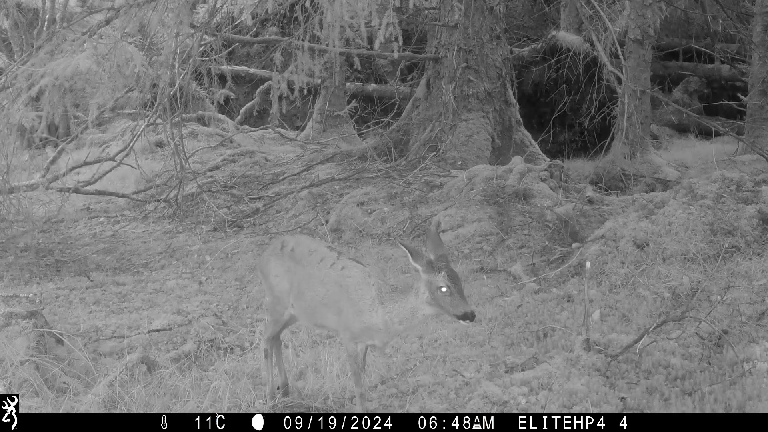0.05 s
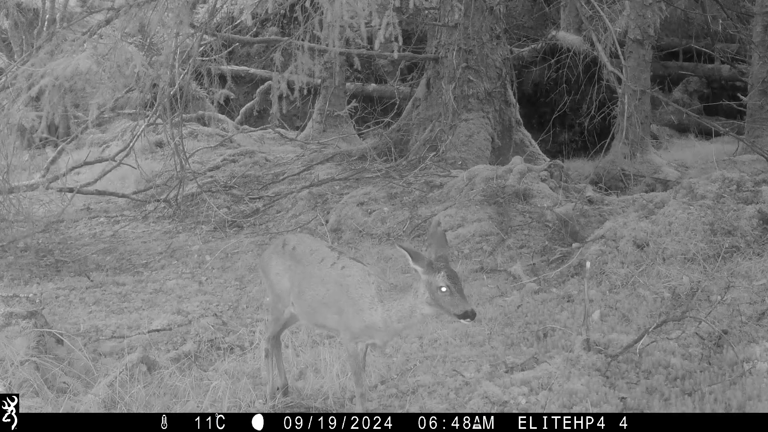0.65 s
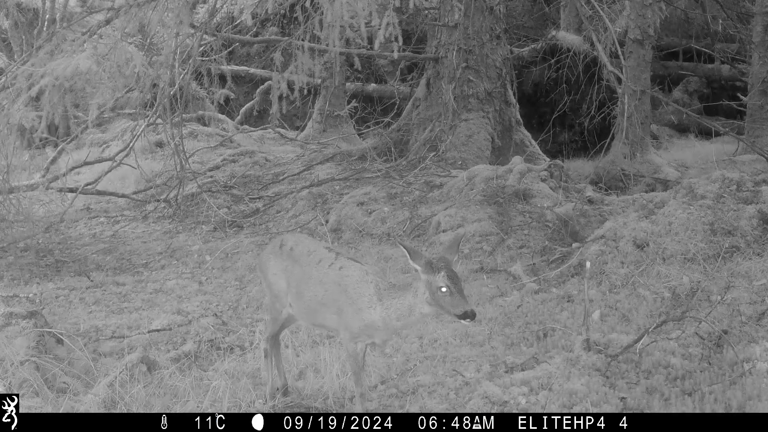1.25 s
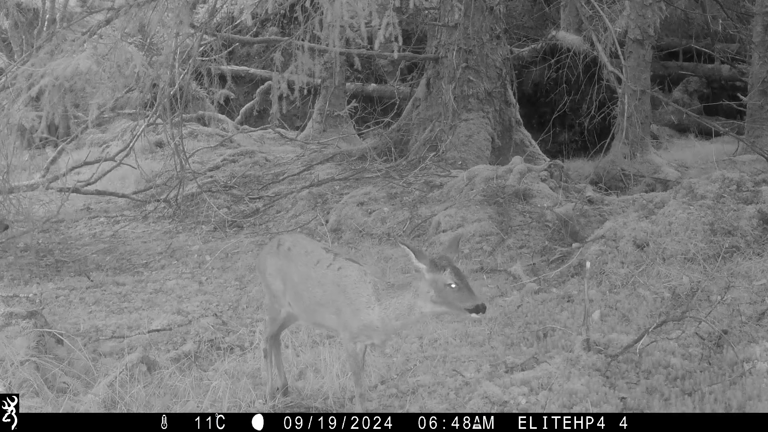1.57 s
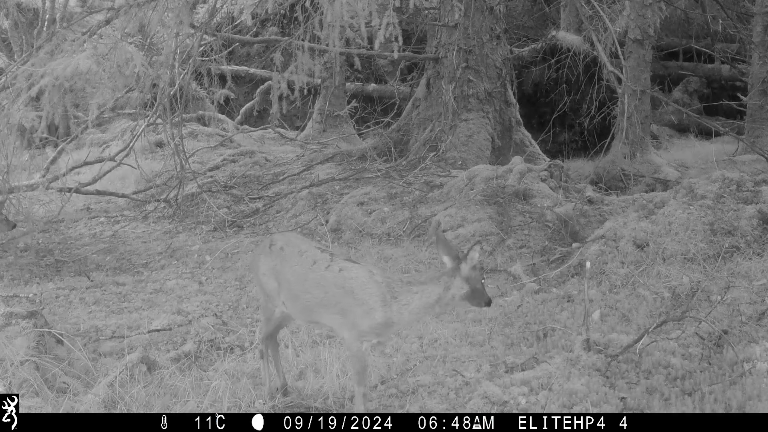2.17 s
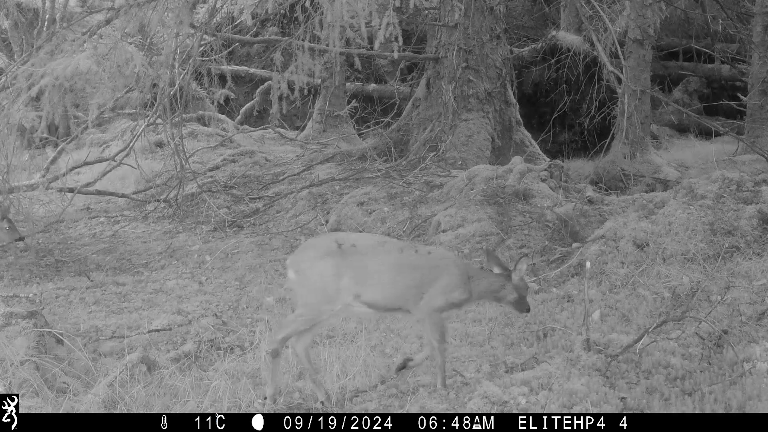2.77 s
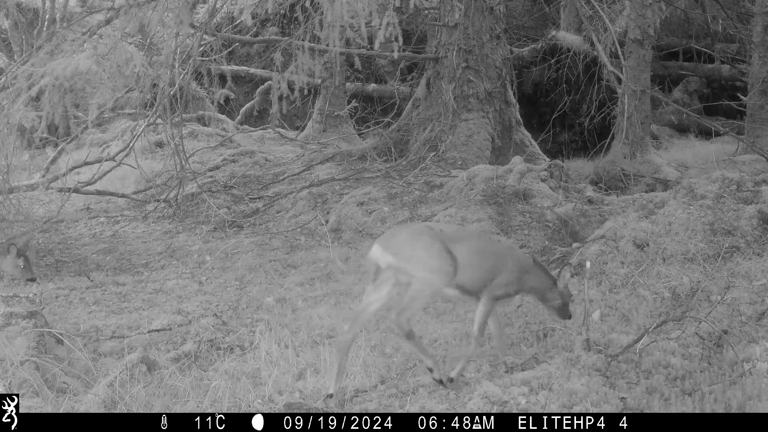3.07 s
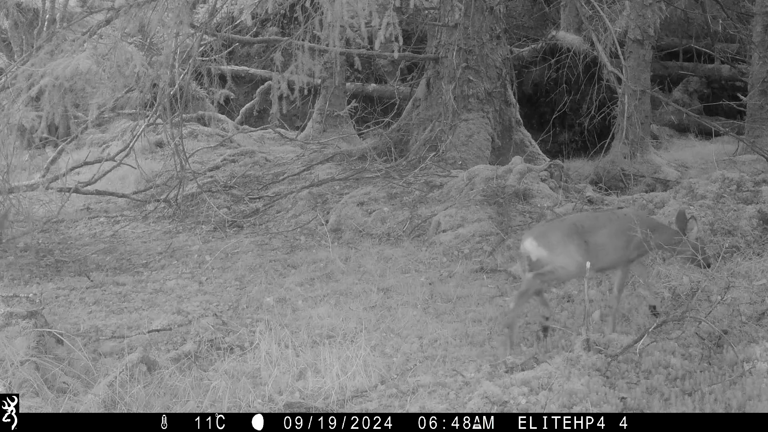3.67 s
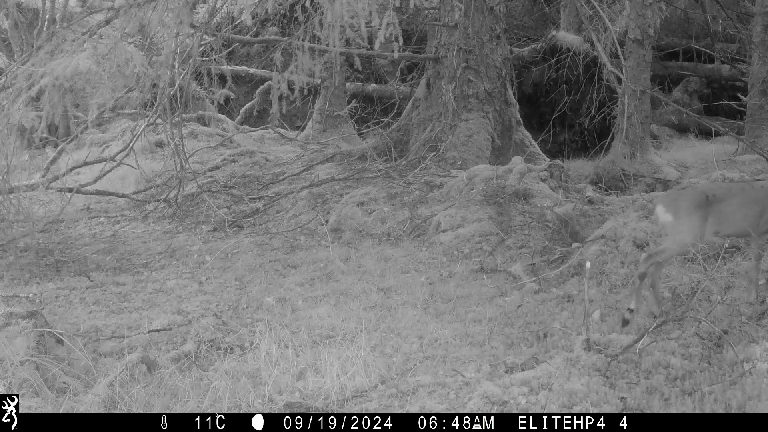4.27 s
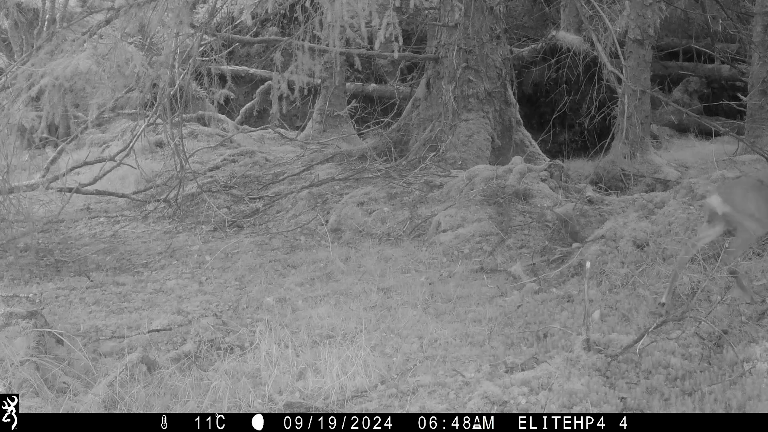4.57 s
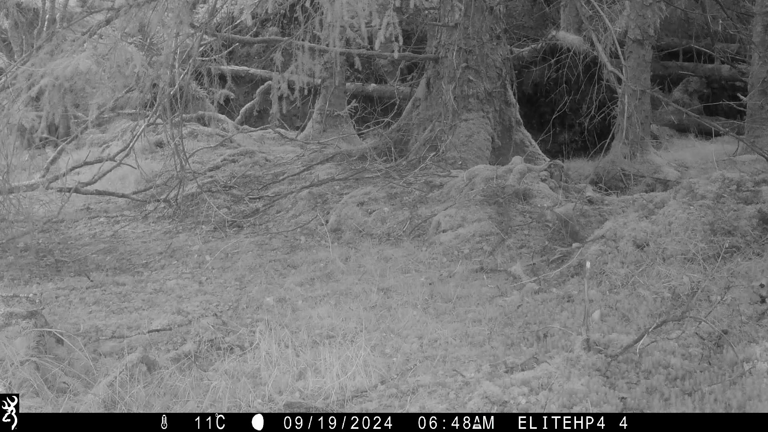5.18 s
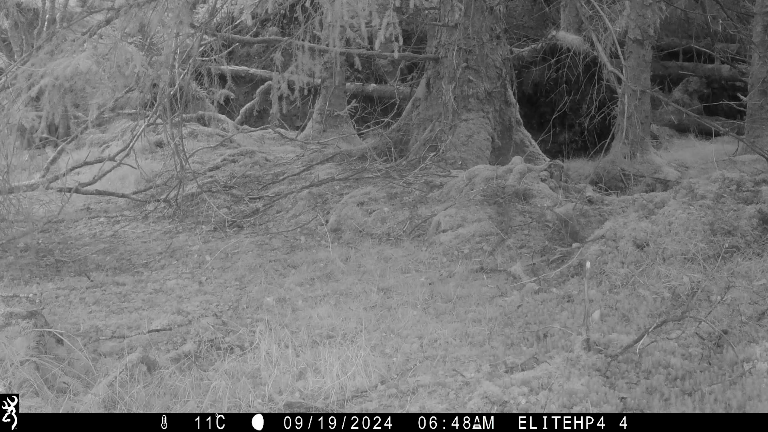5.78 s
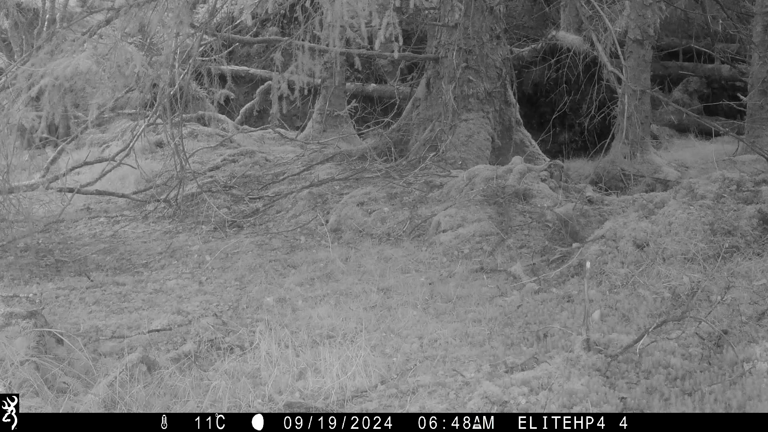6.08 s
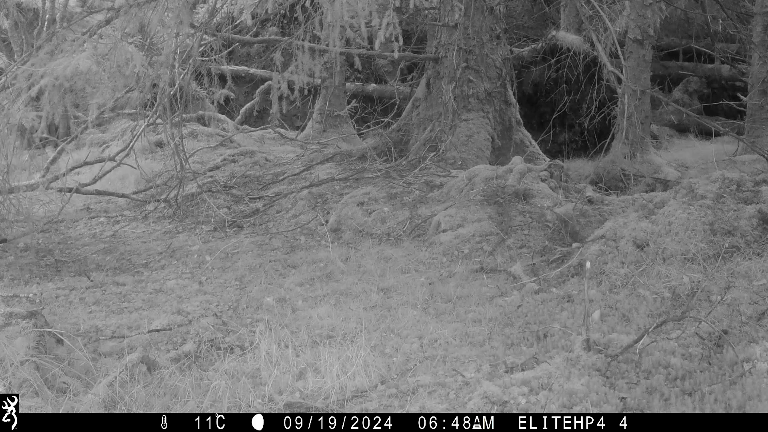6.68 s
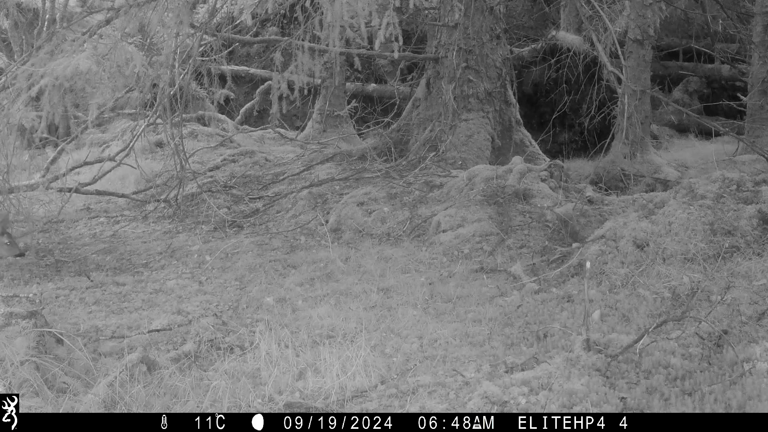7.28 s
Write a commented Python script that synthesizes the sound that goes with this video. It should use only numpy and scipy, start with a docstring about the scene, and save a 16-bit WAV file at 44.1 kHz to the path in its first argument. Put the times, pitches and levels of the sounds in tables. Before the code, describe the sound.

A steady, soft hiss from a small outdoor microphone fills all seven seconds or so, with a very faint, high, buzzing electronic whine above it. At about 1.6 seconds a young deer bleats: a thin, high, nasal squeal about a quarter of a second long that swells, falls in pitch and breaks into a rasp. A brief, low, fluttering throat growl sits underneath. This is the loudest sound. From about 2.7 to 4.2 seconds the deer walks through grass, making a handful of very short, faint swishes with tiny crackles of dry stems, barely above the hiss. At about 4.5 seconds comes a second bleat, just as short but quieter, falling only slightly and fading to a raspy end. The tree trunks around the clearing give the calls a faint, short echo. From about 5 seconds to the end, only the hiss and whine remain.

```python
"""A forest clearing, near a trail camera: a young deer bleats twice and walks off through the grass.
Each bleat is a thin falling squeal that ends in a rasp as the vocal folds slacken; under the first,
the throat flaps in a low growl. Hooves swish and crackle, and the trunks return a faint echo.
The camera's small microphone lays down a steady hiss and its electronics add a faint high whine."""
import sys
import numpy as np
from scipy import signal
from scipy.fft import rfft, irfft
from scipy.io import wavfile

SR = 44100
rng = np.random.default_rng(int(sys.argv[2]) if len(sys.argv) > 2 else 0)


def master(y):
    """Save y as 16-bit WAV."""
    cut = np.clip(np.atleast_2d(y).T, -1, 1)
    pcm = np.round(cut * 32767)  # scale
    wavfile.write(sys.argv[1], SR, pcm.astype(np.int16))


N = 323694

# colour of the microphone hiss: f/Hz, level/dB
HISS_COLOUR = [(25, -31), (100, -16.5), (300, -7), (620, -0.5), (900, -1.5), (1600, -4), (1950, -6.5),
               (2850, -10), (3350, -14.5), (4350, -14), (4850, -26), (6100, -39.5), (7000, -44.5),
               (15500, -48.5)]
# resonances of the microphone port: f/Hz, width/Hz, lift/dB
PORT_PEAKS = [(1287, 190, 5.1), (1690, 83, 1.3), (3945, 220, 3.7)]
# moments when the whine stumbles: t/s
WHINE_STUMBLES = [1.252, 1.963, 2.149, 3.375]
# hooves in grass and twigs: t/s, length/s, swish level/dB, crackle level/dB
HOOF_STEPS = [(.335, .03, -74, -88), (2.712, .025, -66, -86), (2.743, 0.026, -58, -90),
              (3.052, .04, -60, -89), (3.19, .03, -68, -88), (3.535, .04, -60, -90), (3.81, .05, -65, -88),
              (4.072, 0.009, -55, -77), (4.128, .02, -61, -89)]
# colour of brushed grass: f/Hz, level/dB
SWISH_COLOUR = [(800, -24), (2500, -1), (4200, 7), (5000, -10), (6500, -39)]
# colour of snapping stems: f/Hz, level/dB
CRACKLE_COLOUR = [(5000, -18), (8000, -4), (9500, 0), (11000, -3), (14000, -14)]
# low throat resonances that the growl rings: f/Hz, width/Hz, level/dB
GROWL_RESONANCES = [(490, 58, -7), (655, 130, 14), (830, 72, -9)]
# mouth resonances that turbulent air rings: f/Hz, width/Hz, level/dB, share of mouth movement followed
RASP_BANDS = [(2620, 410, -3, .3), (4280, 580, 0.5, 1), (5230, 640, -14, 0.041)]
# throat EQ as heard through the microphone, at a mouth opening of 1: f/Hz, level/dB
THROAT_EQ = [(650, 9.5), (1000, -24), (1500, -0.5), (2060, 10.5), (2400, 11), (3050, 7.5), (3800, -4.5),
             (4120, 9), (4550, 8), (4820, 2.5), (5250, -10.5), (6500, -28), (10400, -18)]
# bleats: t/s, hold/s, sag/s, tail/s, top pitch/Hz, pitch break/Hz, effort/dB, tail fade/dB,
# nasal lift/dB, top brightness/dB, slack brightness/dB, mouth opening/factor, closing in the tail/share
BLEAT_CUES = [(1.597, .053, .15, .068, 1040, 250, -39.5, -2.5, 9.5, -0.5, -1.5, .99, 0.009),
              (4.52, .064, .084, 0.095, 1004, 8, -46, -17, 16, -5, 9, .92, .08)]


def amp(db):
    """Decibels to gain."""
    return 10 ** (np.asarray(db) / 20)


def unit(x):
    """Scales to rms 1."""
    return x / np.sqrt(np.mean(x ** 2) + 1e-20)


def ramp(t, start, length):
    """Climbs from 0 at start to 1 after length, and stays there."""
    return np.clip((t - start) / length, 0, 1)


def eq_db(points, hz):
    """Reads an EQ curve on a log-frequency axis."""
    f, db = np.transpose(points)
    return np.interp(np.log(hz + 1), np.log(f), db)


def add(mix, start_s, sound):
    """Mixes a sound in at its cue."""
    part = mix[round(start_s * SR):][:len(sound)]
    part += sound[:len(part)]


def noise(colour, peaks=()):
    """Noise of rms 1, shaped by an EQ curve and bell boosts."""
    hz = np.fft.rfftfreq(N, 1 / SR)
    db = eq_db(colour, hz) + sum(lift / (1 + (2 * (hz - f) / width) ** 2) for f, width, lift in peaks)
    return unit(irfft(rfft(rng.standard_normal(N)) * amp(db), N))


def wobble(hz):
    """Random modulation of rms 1, rolling off above hz."""
    f = np.fft.rfftfreq(N, 1 / SR)
    return unit(irfft(rfft(rng.standard_normal(N)) / (1 + (f / hz) ** 2), N))


def microphone_hiss(level_db=-50):
    """The bed: steady hiss, coloured by the resonances of the microphone port."""
    return amp(level_db) * noise(HISS_COLOUR, PORT_PEAKS)


def electronics_whine(hz=7796.3, flips_per_s=59.5, level_db=-79, overtone_db=-102):
    """A high tone buzzes as it flips its sign; at each brief stumble it jumps in pitch and ducks."""
    t = np.arange(N) / SR
    stumble_s, mean_jump_hz, duck_db = .027, 175, -4
    stumbling = sum((t > start) & (t < start + stumble_s) for start in WHINE_STUMBLES)
    phase = 2 * np.pi * np.cumsum(hz + mean_jump_hz * stumbling * (1 + wobble(300))) / SR
    flips = np.sign(np.sin(np.pi * flips_per_s * t))
    buzz = amp(level_db + duck_db * stumbling) * flips * np.sin(phase)
    return np.sqrt(2) * (buzz + amp(overtone_db) * np.sin(2 * phase))


def trunk_echo(sound, decay_s=.35, wet_db=-22, predelay_s=.015, echoes_per_s=2000):
    """Trunks scatter a faint, short reverb behind the direct sound."""
    t = np.arange(SR // 2) / SR
    taps = rng.standard_normal(len(t)) * (rng.random(len(t)) < echoes_per_s / SR) * (t > predelay_s)
    tail = taps * np.exp(-np.log(1000) * t / decay_s)
    return sound + amp(wet_db) * signal.fftconvolve(sound, tail / np.linalg.norm(tail))[:N]


def hooves(grain_db=3):
    """Each hoof brushes the grass and cracks a few dry stems."""
    track, t = np.zeros(N), np.arange(N) / SR
    swish = noise(SWISH_COLOUR)
    crackle = unit(noise(CRACKLE_COLOUR) * amp(grain_db * wobble(400)))
    for start, length, swish_db, crackle_db in HOOF_STEPS:
        press = np.sin(np.pi * ramp(t, start, length))
        track += press * (amp(swish_db) * swish + amp(crackle_db) * crackle)
    return track


def throat_growl(level_db=-52.5, fade_s=.0392, hold_s=.13, unevenness=.204, band_hz=(380, 1000)):
    """The throat flaps in uneven, quickening pulses that ring its low resonances."""
    t = np.arange(0, fade_s + hold_s + fade_s, 1 / SR)
    envelope = ramp(t, 0, fade_s) - ramp(t, fade_s + hold_s, fade_s)
    flaps_per_s = np.linspace(66, 96, len(t)) * np.exp(unevenness * wobble(60)[:len(t)])
    clicks = np.diff(np.floor(np.cumsum(flaps_per_s) / SR), prepend=0)
    band = signal.butter(2, band_hz, "band", fs=SR, output="sos")
    pulses = signal.sosfilt(band, clicks)  # soft, and too small for bass
    ring = sum(amp(db) * np.exp(-np.pi * width * t) * np.cos(2 * np.pi * hz * t)
               for hz, width, db in GROWL_RESONANCES)
    return amp(level_db) * envelope * unit(signal.fftconvolve(pulses, ring)[:len(t)])


def air_rasp(hz, width_hz):
    """Turbulent air rings one mouth resonance: a noise band riding the curve hz."""
    smooth = signal.butter(2, width_hz / 2, fs=SR, output="sos")
    drift = signal.sosfilt(smooth, rng.standard_normal(len(hz)) + 1j * rng.standard_normal(len(hz)))
    return unit((drift * np.exp(2j * np.pi * np.cumsum(hz) / SR)).real)


def bleat_envelopes(hold_s, sag_s, tail_s, top_hz, break_hz, top_db, tail_db, nasal_lift_db,
                    top_bright_db, slack_bright_db, opening, closing, break_s=.11):
    """The voice swells on a held note, sags as the folds slacken, then breaks and trails off."""
    length = hold_s + sag_s + tail_s
    t = np.arange(0, length, 1 / SR)
    swell, slack = ramp(t, 0, hold_s), ramp(t, hold_s, sag_s)
    tail = np.sqrt(ramp(t, hold_s + sag_s, tail_s))
    breaking = ramp(t, length - break_s, break_s)
    pitch = top_hz * (1 - .0128 * np.sin(np.pi * swell) - .102 * slack) - break_hz * breaking ** 2
    effort_db = top_db - 5.5 * (1 - swell) ** 2 - 9.5 * slack ** 2 + tail_db * tail
    # the nose rings late in the hold, and again as the voice breaks
    nasal_ring = np.exp(-((t - .87 * hold_s) / .041) ** 2)
    nasal_db = -8.5 + nasal_lift_db * nasal_ring + 7.5 * np.sin(np.pi * breaking)
    bright_db = top_bright_db - 9 * (1 - swell ** 2)  # dull attack
    bright_db += (slack_bright_db - top_bright_db) * np.sqrt(slack)
    bright_db -= .47 * tail_db * tail  # air and upper overtones escape part of the fade
    rough = .02 + .42 * slack ** 2 + .22 * tail  # nearly clean on the hold, roughest at the end
    mouth = opening * (1 - closing * np.sqrt(tail))
    return t, pitch, effort_db, nasal_db, bright_db, rough, mouth


def bleat(shape, jitter=.049, shimmer=.44, flutter_db=3, tilt_db_per_octave=-12, rasp_db=-9,
          edge_s=.0026, harmonics=10):
    """Vocal folds sound a harmonic stack through the throat; slackening, they jitter and air rasps past."""
    t, pitch, effort_db, nasal_db, bright_db, rough, mouth = bleat_envelopes(*shape)
    n, k = len(t), np.arange(1, harmonics + 1)[:, None]
    phase = 2 * np.pi * np.cumsum(pitch * (1 + jitter * rough * wobble(250)[:n])) / SR
    high_shelf = ramp(k * pitch, 3100, 600)  # fades in from 3100 to 3700 Hz
    flutter = wobble(45)[:harmonics * n].reshape(harmonics, n) * (k > 2)  # separate for each overtone
    level_db = tilt_db_per_octave * np.log2(k) + eq_db(THROAT_EQ, k * pitch / mouth)
    level_db += bright_db * high_shelf + flutter_db * flutter + nasal_db * (k == 3)
    stack = (amp(level_db) * np.sin(k * phase)).sum(0)
    folds = np.sqrt(2) * stack * (1 + shimmer * np.sqrt(rough) * wobble(130)[:n])
    air = sum(amp(db) * air_rasp(hz * mouth ** follow, width) for hz, width, db, follow in RASP_BANDS)
    gate = ramp(np.minimum(t, t[-1] - t), 0, edge_s)
    return amp(effort_db) * gate * (folds + amp(rasp_db + bright_db) * rough * air)


def scene():
    """The mono mix: voice and hooves echo in the clearing, over a bed of hiss and whine."""
    voice = np.zeros(N)
    for start_s, *shape in BLEAT_CUES:
        add(voice, start_s, bleat(shape))
    add(voice, 1.63, throat_growl())  # under the first bleat
    return (trunk_echo(voice + hooves()) + microphone_hiss() + electronics_whine())[None]


def record(dry):
    """The recorder's band limit: a steep high cut at 15750 Hz."""
    low_pass = signal.firwin(1023, 15750, window=("kaiser", 8), fs=SR)
    return signal.oaconvolve(dry, low_pass[None], "same")


dry = scene()
out = record(dry)
master(out)
```